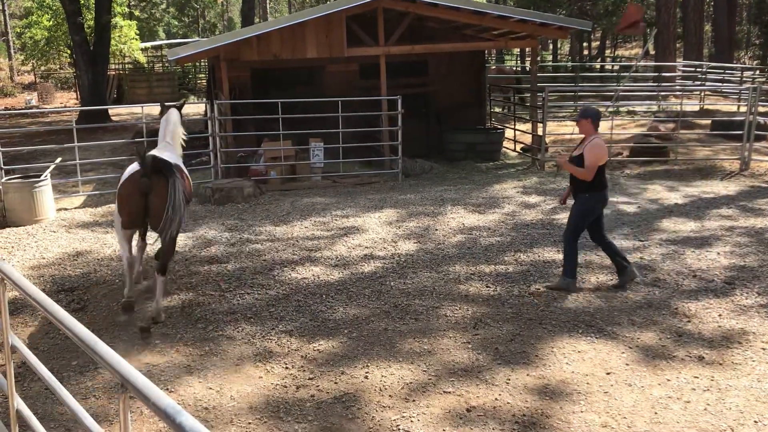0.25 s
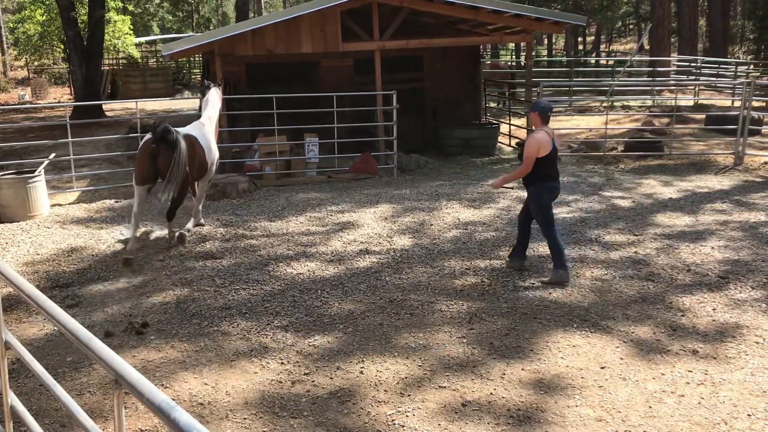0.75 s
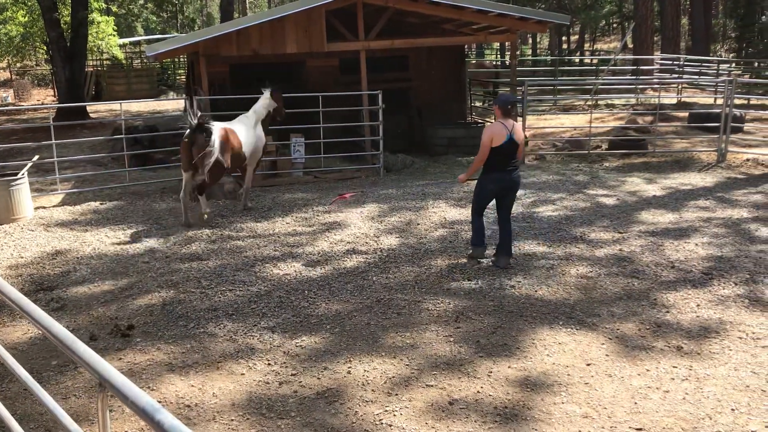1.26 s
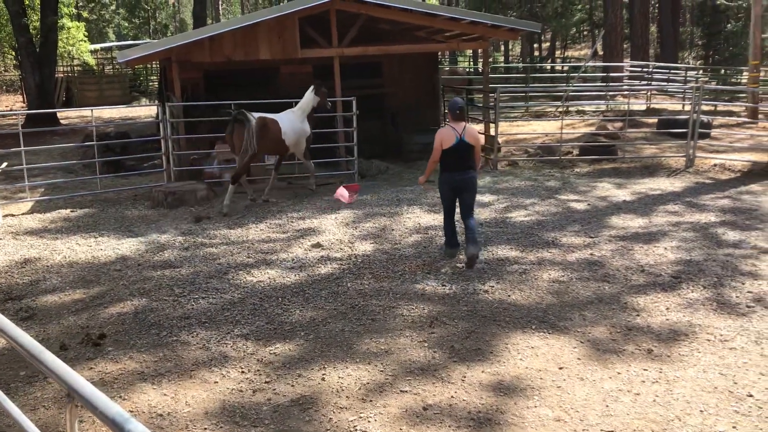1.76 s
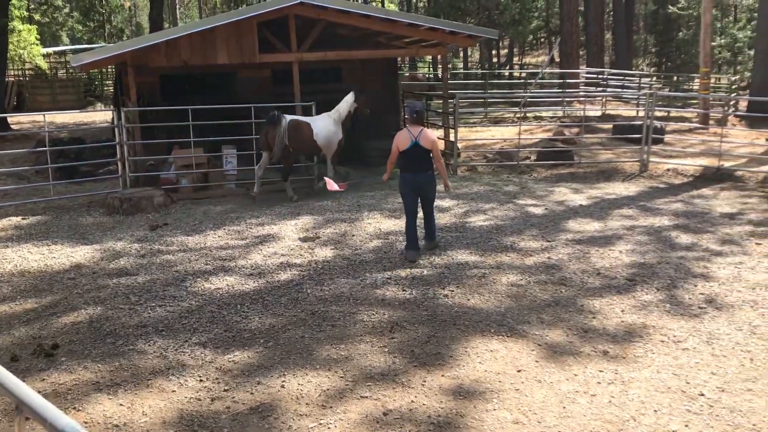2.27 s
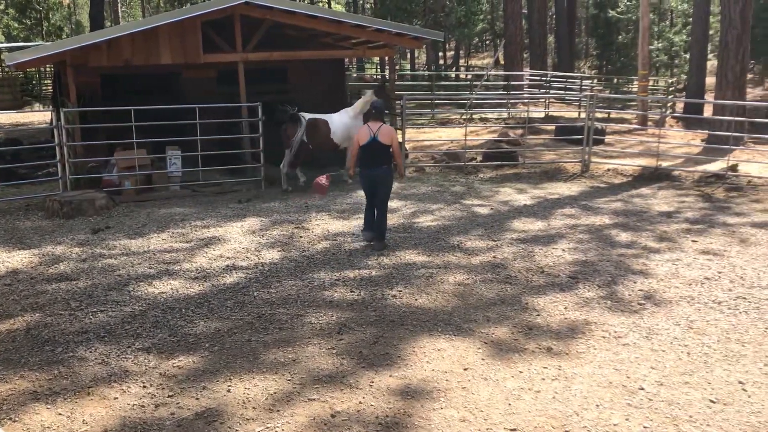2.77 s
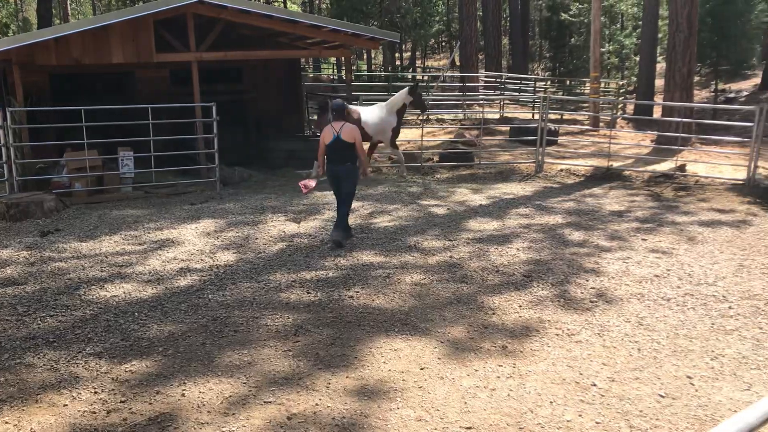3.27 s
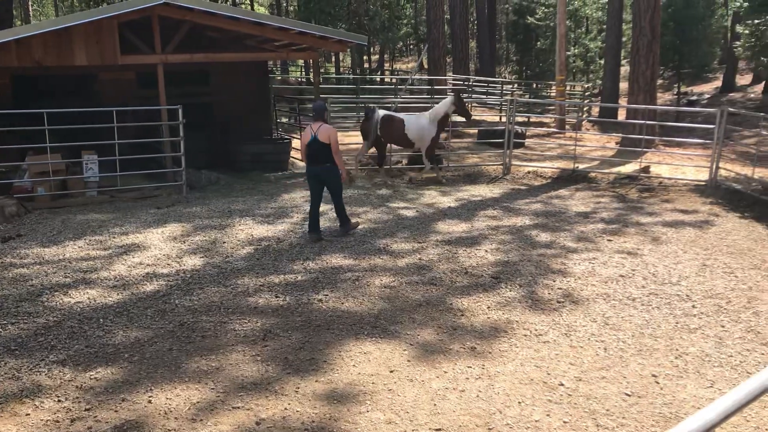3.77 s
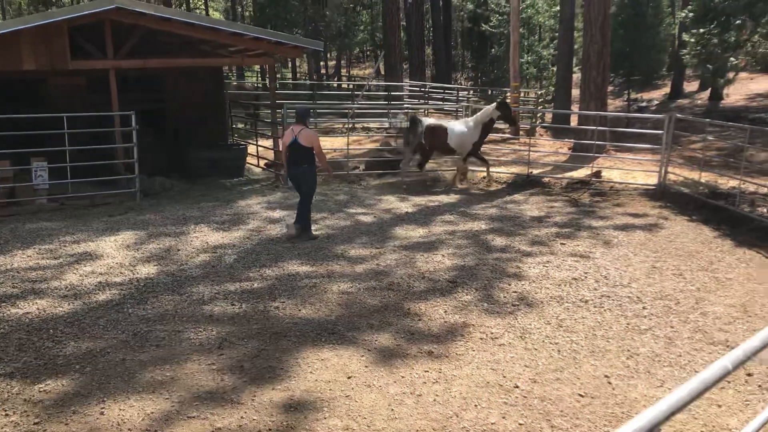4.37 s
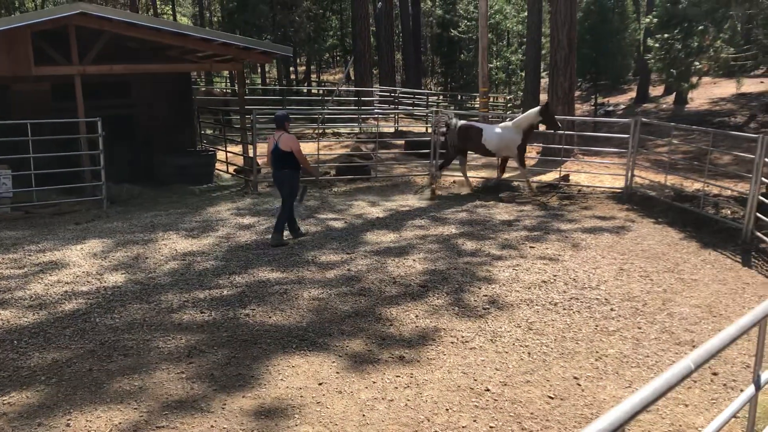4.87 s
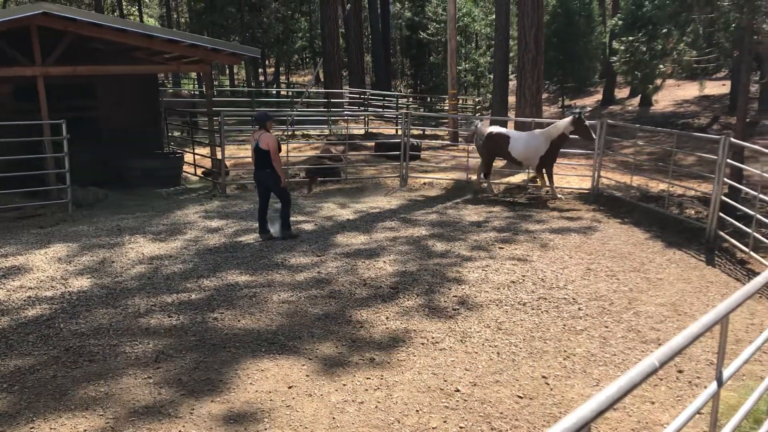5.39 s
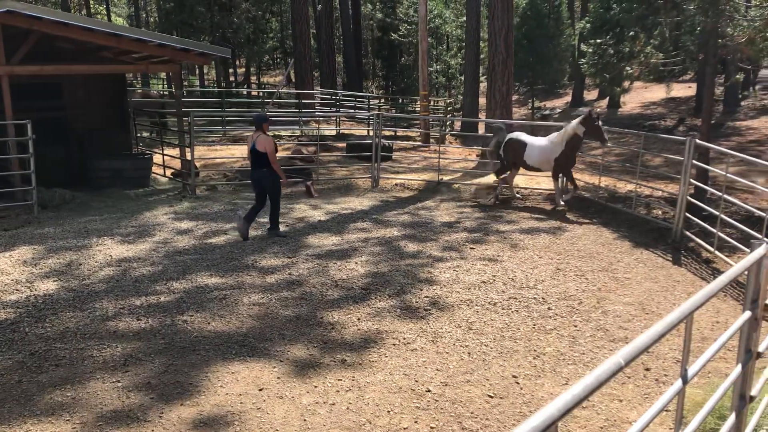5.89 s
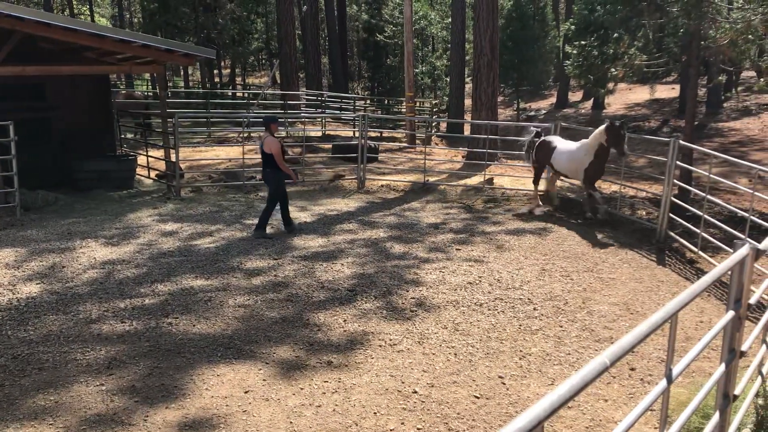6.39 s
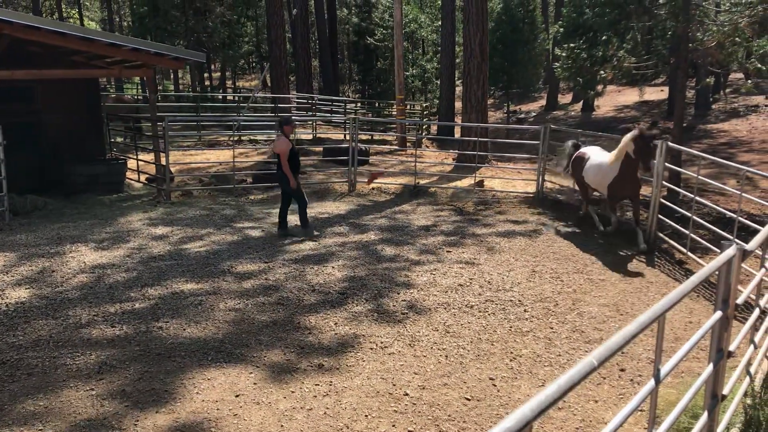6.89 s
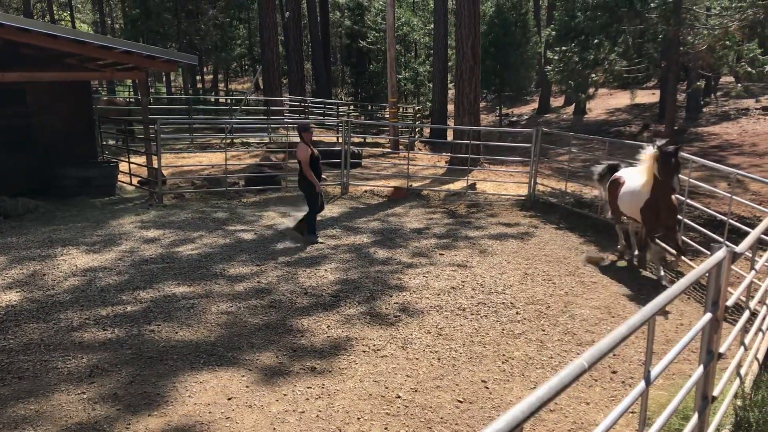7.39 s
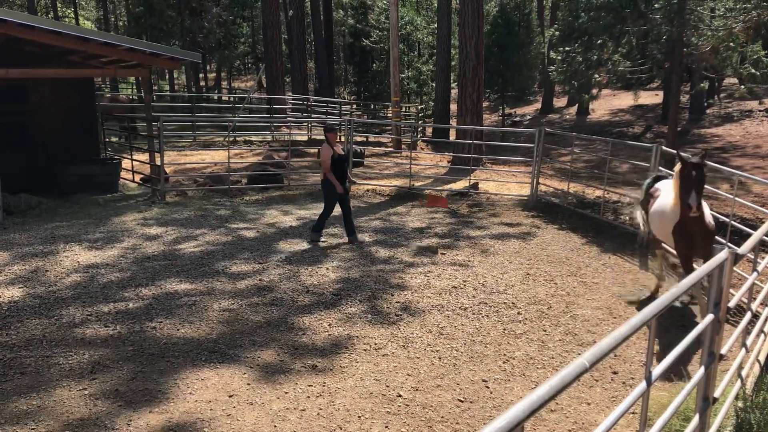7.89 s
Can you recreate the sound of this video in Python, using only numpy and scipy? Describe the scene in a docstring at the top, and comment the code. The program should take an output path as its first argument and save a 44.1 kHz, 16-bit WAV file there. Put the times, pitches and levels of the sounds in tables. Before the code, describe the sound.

Quick, uneven crunches and low thuds of a trotting horse begin near the microphone at the edge of a gravel pen. They recede, carry on softly at the far side, then approach again. Sharp stone clicks, trickling grit, a handler's steps and the odd snap of a stiff flag run through them. The surrounding trees add a slight echo and a faint, steady hush.

```python
"""A gravel pen among trees: a horse trots away from the listener and back.
Each hoof thuds on the packed ground and ploughs the gravel, and a handler's boots crunch along.
Stones clack and trickle, fine grit ticks, and a stiff flag on a stick snaps. With distance the thuds
smear and the gravel dulls. The trees scatter the sound back, and the forest hushes behind."""
import sys
import numpy as np
from scipy import signal
from scipy.fft import rfft, irfft, next_fast_len
from scipy.io import wavfile
from scipy.ndimage import map_coordinates

SR = 44100
rng = np.random.default_rng(int(sys.argv[2]) if len(sys.argv) > 2 else 0)


def digitize_waveform(pressure):
    """Quantize a signal to 16-bit integers and store it at the path in sys.argv[1].

    Rows of a 2-D input are taken as channels; values are limited to [-1, 1].
    """
    field = np.atleast_2d(pressure).T
    bounded = np.clip(field, -1, 1)
    quanta = np.round(bounded * 32767).astype(np.int16)
    wavfile.write(sys.argv[1], SR, quanta)


N = 359018

# the bright tone colour of crunching grit: f/Hz, level/dB
GRIT_SPECTRUM = [(1500, -8.5), (3500, 0.5), (6000, -5), (10000, -3), (16000, -10)]


def hoof_thuds():
    """The ground answers a hoof with a few low cycles that sink in pitch, a dull rumble and a shake."""
    # hooves landing on packed ground: t/s, level/dB, nominal ground f/Hz
    landings = [(0.06, -35.5, 148), (0.304, -40, 187), (0.475, -46, 179), (0.826, -58, 220),
                (0.95, -45.5, 238), (1.195, -53, 225), (1.56, -45, 180), (1.943, -53, 235),
                (2.362, -49, 182), (3.455, -42, 223), (3.66, -50.5, 200), (3.83, -42, 199),
                (4.212, -50, 232), (4.353, -50.5, 192), (4.822, -49, 230), (4.979, -45.5, 191),
                (5.374, -46.5, 232), (6.204, -43.5, 182), (6.594, -50, 144), (6.96, -39.5, 216),
                (7.33, -37, 101), (7.574, -39.5, 280), (7.661, -31, 160), (7.923, -27.5, 89),
                (5.035, -48.5, 139)]
    out, t = np.zeros(N), np.arange(SR // 4) / SR
    for s, db, hz in landings:
        t60 = 0.038 + 0.0083 * horse_metres(s)  # a far thud smears longer
        envelope = amp(db - 60 * t / t60) * (1 - np.exp(-t / 0.0035))
        phase = 2 * np.pi * hz * (0.797 * t + 0.00798 * (1 - np.exp(-t / 0.017)))
        rumble = 0.52 * noise_band(len(t), 1.54 * hz, width_hz=2.56 * hz)
        shake = 0.22 * noise_band(len(t), hz=77, width_hz=90) * amp(30 * t / t60)  # lasts twice as long
        add(out, s, envelope * (np.sin(phase) + rumble + shake))
    return out


def gravel_scuffs():
    """The crunch swells as a foot slides in and dies as the gravel settles; the soil beneath grumbles."""
    # hooves and boots ploughing gravel: t/s, level/dB, stone f/Hz, grit share/dB, t60/s
    scuffs = [(0.052, -21.5, 1070, -9, 0.11), (0.1, -25, 1370, -7.5, 0.21), (0.174, -32.5, 1100, -8, 0.15),
              (0.453, -32, 1120, 2, .21), (0.539, -42, 2180, -24, 0.17), (0.754, -35, 960, -7, .19),
              (0.819, -23.5, 1800, -0.5, .17), (1.108, -36, 1650, -2, 0.08), (1.175, -29, 1720, -2, .27),
              (1.275, -30, 1000, -12, 0.095), (1.455, -37.5, 1097, -1.5, 0.23),
              (1.55, -28, 2260, -1, 0.094), (1.934, -30, 1300, -9.5, .15), (2.286, -31, 1140, -5, 0.2),
              (2.504, -35.5, 1670, -24, 0.085), (2.582, -39, 706, -4.5, 0.073),
              (2.682, -35.5, 1460, -4.5, 0.083), (3.046, -38.5, 990, -7.5, .11),
              (3.118, -42.5, 970, -4, 0.27), (3.198, -33.5, 750, -8, 0.072), (3.309, -42.5, 886, -22, 0.12),
              (3.456, -39, 940, 0, 0.079), (3.492, -30, 2780, -7.5, 0.17), (3.654, -39, 2630, 3.5, 0.085),
              (3.692, -39, 2350, -2, .12), (3.805, -34, 2310, -8, 0.19), (3.861, -32.5, 2250, 0.5, .14),
              (3.968, -38.5, 977, -11, 0.15), (4.19, -35, 3530, -16, 0.26), (4.202, -39, 910, 1, 0.16),
              (4.357, -39.5, 730, 1.5, 0.15), (4.556, -35.5, 1420, -2.5, 0.13), (4.659, -37, 3200, 4, 0.12),
              (4.729, -37, 3400, 1.5, 0.13), (4.817, -39.5, 2530, 1, 0.062), (4.98, -46, 890, 3, .1),
              (5.04, -39.5, 1350, -1, 0.063), (5.349, -38, 930, -7, .135), (5.398, -37, 2290, -1, 0.18),
              (5.583, -50.5, 3520, 10.5, 0.081), (5.766, -41.5, 2700, -3.5, .12),
              (6.092, -46, 900, 0, 0.11), (6.293, -36.5, 2440, 1, 0.08), (6.422, -39, 875, 3.5, 0.079),
              (6.587, -37, 710, -8.5, 0.081), (6.943, -37.5, 980, -2, 0.19), (7.013, -32.5, 950, -7, 0.064),
              (7.04, -38, 2800, -22, 0.13), (7.189, -39.5, 2850, -6, 0.11), (7.319, -35.5, 870, -5, .09),
              (7.423, -37, 2660, -9, 0.059), (7.576, -30.5, 890, -14, 0.048),
              (7.655, -37, 920, -4.5, 0.073), (7.957, -26.5, 1050, -18, 0.14), (7.989, -40, 980, -7, 0.21)]
    out, t = np.zeros(N), np.arange(SR // 4) / SR
    for s, db, hz, grit_db, t60 in scuffs:
        slide_s = 0.16 * t60
        swell = np.clip(t / slide_s, 0, 1) ** 0.34
        settle = amp(-60 * (np.maximum(t - slide_s, 0) / t60) ** 1.157)  # holds, then drops away
        stones = pebbles(len(t), per_second=1800, hz=hz, cycles=0.43, spread_db=10, octaves=1.68)
        snaps = pebbles(len(t), per_second=160, hz=6400, cycles=0.52, spread_db=24, octaves=3.1)
        grit = sand(len(t), per_second=1500, smooth=0.99) + amp(-2) * snaps
        soil = amp(-10) * noise_band(len(t), hz=210, width_hz=410)
        add(out, s, amp(db - 15.5) * swell * settle * (stones + soil + amp(grit_db) * grit))
    return out


def clacks():
    """Stones knock or the flag snaps: a blow rings briefly at one pitch and cracks in the treble."""
    # single stone knocks and flag snaps: t/s, peak level/dB, f/Hz, treble share/dB
    knocks = [(0.023, -14.5, 2070, 6), (0.0283, -15, 2240, -11), (0.053, -24.5, 1430, -11),
              (0.065, -25.5, 1810, -14), (0.108, -28, 1350, -4.5), (0.153, -41, 883, -5),
              (0.182, -36, 1070, -22), (0.205, -32, 900, -24), (0.253, -29.5, 1070, -30),
              (0.314, -27, 1215, -4.5), (0.439, -32, 2260, -16), (0.569, -32.5, 2320, -23),
              (0.754, -33.5, 935, -2.5), (0.803, -24, 1620, -18), (0.817, -12, 1820, 12),
              (0.91, -32.5, 1410, -19), (0.934, -31.5, 961, -25), (0.965, -35, 2090, -15),
              (1.057, -29.5, 1950, -1), (1.106, -34.5, 1670, -6), (1.16, -38, 2680, -25),
              (1.175, -24.5, 1800, 11), (1.202, -28, 1860, -1), (1.213, -22.5, 1210, 3),
              (1.275, -35, 2510, -14), (1.29, -31, 940, -30), (1.458, -35.5, 1050, -15),
              (1.4735, -28, 2500, 26), (1.497, -41, 2770, -15), (1.516, -28.5, 2710, 11),
              (1.565, -38, 2430, 4), (1.671, -30, 1590, 4), (1.703, -24.5, 806, 11),
              (1.73, -21.5, 2830, -17), (1.844, -43.5, 1400, -14), (1.945, -26.5, 1150, 3),
              (2.176, -44, 1390, -16), (2.299, -29, 1030, 10), (2.371, -32, 1480, -27),
              (2.502, -38, 1720, -25), (2.672, -35, 1470, 3), (3.212, -38, 750, -32),
              (3.455, -32.5, 920, 8), (3.49, -38, 2440, -19), (3.664, -36, 2640, 6),
              (3.693, -27.5, 2240, -1), (3.821, -30, 2510, 21), (3.861, -39, 2400, -14),
              (3.897, -38, 2370, -6), (4.042, -39, 940, -5), (4.22, -28, 890, 3.5), (4.306, -37, 2800, -20),
              (4.288, -41, 900, -3), (4.321, -39, 2490, -20), (4.356, -31, 860, 5), (4.562, -30.5, 1290, 1),
              (4.671, -23.5, 3160, 19), (4.699, -41, 2500, -10), (4.763, -34.5, 3920, -10),
              (4.817, -29, 2830, -5), (5.099, -23, 1560, 13), (5.891, -35.5, 2900, 0),
              (6.273, -28, 2600, -39), (6.295, -43, 2490, -16), (6.306, -39, 3390, -20),
              (6.435, -29, 850, 0), (6.481, -39.5, 900, -9.5), (6.679, -29, 2650, 5.5),
              (6.864, -35, 845, 4.5), (6.978, -23.5, 940, 15), (7.013, -30, 934, -29),
              (7.049, -29.5, 2500, -25), (7.093, -29, 2490, 4), (7.114, -22.5, 2490, -0.5),
              (7.132, -34, 880, -19), (7.148, -28, 2580, -19), (7.172, -20, 2490, 11),
              (7.19, -27.5, 2800, -31), (7.343, -35, 910, -28), (7.445, -27.5, 1480, 13),
              (7.583, -33.5, 1100, -26), (7.665, -35.5, 1000, -33), (7.789, -39.5, 2300, -17),
              (7.919, -22.5, 930, -29), (8.004, -34.5, 930, -22)]
    out, t = np.zeros(N), np.arange(SR // 16) / SR
    for s, db, hz, treble_db in knocks:
        force = rattle(t, t60=0.019, blow=2.96)
        ring = filtered(force, lambda f: resonance(f, hz, hz / 2.66) * resonance(f, hz, 6.3 * hz) ** 2)
        clack = unit(ring) + amp(treble_db) * gritty(force)
        add(out, s, amp(db) * clack / np.abs(clack).max())
    return out


def grit_ticks():
    """Grit too small to ring low ticks in the treble."""
    # fine grit ticking and spraying: t/s, peak level/dB
    ticks = [(0.122, -22.5), (0.174, -34), (0.2138, -26.5), (0.3935, -36), (0.4505, -17), (0.5324, -29),
             (0.561, -34), (0.7926, -41), (0.8064, -16), (1.377, -34.5), (1.873, -37.5), (1.931, -38),
             (2.1117, -35), (2.281, -37), (2.4673, -43), (3.6559, -31.5), (4.155, -42), (4.188, -37),
             (4.579, -47), (4.7177, -32), (4.81, -30), (4.9102, -40), (5.152, -36.5), (5.3055, -43),
             (5.416, -30.5), (5.4454, -34), (5.4745, -29), (5.5394, -36), (5.554, -34), (5.612, -34.5),
             (5.6257, -37), (5.889, -33.5), (5.981, -40), (6.329, -40), (6.4095, -32), (7.0414, -29.5),
             (7.1172, -19), (7.149, -20.5), (7.2976, -40), (7.318, -37), (7.3736, -39), (7.416, -37),
             (7.4363, -31), (7.6076, -41), (7.6273, -33), (7.7528, -37.5), (7.9468, -42), (7.989, -49)]
    out, t = np.zeros(N), np.arange(SR // 16) / SR
    for s, db in ticks:
        hz = 14950 - 480 * horse_metres(s)  # far ticks lose their top
        force = rattle(t, t60=0.017, blow=4.45)
        tick = filtered(force, lambda f: resonance(f, hz, 1.23 * hz) ** 2)
        add(out, s, amp(db) * tick / np.abs(tick).max())
    return out


def gravel_trickle():
    """Small stones keep rolling and ticking, in uneven flurries."""
    # loose gravel between the steps: t/s, stone level/dB, grit level/dB
    levels = [(0.0, -54, -61), (0.22, -49.5, -58), (0.59, -50.5, -62), (0.81, -64, -75),
              (0.95, -50.5, -49.5), (1.2, -70, -61), (1.68, -55, -59), (2.02, -69.5, -68.5),
              (2.51, -61, -66.5), (3.0, -65.5, -71), (4.28, -67, -63), (6.01, -64.5, -69.5),
              (6.9, -64.5, -74), (7.12, -61.5, -67.5), (7.66, -64, -72), (8.14, -62, -64)]
    s, stones_db, grit_db = np.transpose(levels)
    t = np.arange(N) / SR
    stone_flurry, grit_flurry = amp(2.2 * wobble(30)), amp(2.2 * wobble(40))
    stones = pebbles(N, per_second=2300, hz=1096, cycles=0.97, spread_db=11, octaves=3.15)
    grains = sand(N, per_second=300, smooth=2.1)
    snaps = pebbles(N, per_second=70, hz=7100, cycles=0.94, spread_db=4, octaves=2.1)
    rolling = amp(np.interp(t, s, stones_db)) * unit(stone_flurry * stones)
    ticking = amp(np.interp(t, s, grit_db)) * unit(grit_flurry * (grains + 0.8 * snaps))
    return rolling + ticking


def pebbles(size, per_second, hz, cycles, spread_db, octaves):
    """Many small stones, each ringing briefly at its own pitch around hz; rms 1."""
    when, pitch, strength, side = rng.random((4, int(size * per_second / SR)))
    own_hz = np.clip(hz * 2 ** (octaves * (pitch - 0.5)), 300, 15000)[:, None]
    t = np.arange(200) / SR
    turns = t * own_hz
    attack = 1 - np.exp(-2 * turns)  # rounded stones meet softly
    decay = np.exp(-turns / cycles) * np.cos(np.pi / 2 * t / t[-1])
    kick = np.sign(side - 0.5) * amp(spread_db * strength ** 2)
    rings = kick[:, None] * np.sqrt(own_hz) * np.sin(2 * np.pi * turns) * attack * decay
    at = (when * size).astype(int)[:, None] + np.arange(len(t))
    return unit(np.bincount(at.ravel(), rings.ravel(), size)[:size])


def sand(size, per_second, smooth):
    """Sand grain contacts of unequal size over a share of smooth noise; rms 1."""
    touches = rng.random(size) < per_second / SR
    strength, wash = rng.standard_normal((2, size))
    hits = touches * strength * np.sqrt(np.abs(strength))
    return gritty(unit(hits) + smooth * wash)


def gritty(force):
    """Gives a force the bright colour of grit; rms 1."""
    return unit(filtered(force, lambda f: amp(along(GRIT_SPECTRUM, f))))


def rattle(t, t60, blow):
    """The force of a fast-dying rattle that opens with one sharper blow."""
    decay = amp(-60 * t / t60) * (0.85 + 0.17 * np.exp(-t / 0.0017))
    force = (1 - np.exp(-t / 0.00053)) * decay * rng.standard_normal(len(t))
    force[12] += blow
    return force


def hiss_puff():
    """One puff of thin, high hiss near the end starts at once and fades."""
    start_s, db, t60, low_hz, high_hz = 8.008, -56, 0.4, 7400, 12500
    out, t = np.zeros(N), np.arange(SR // 5) / SR
    noise = rng.standard_normal(len(t))
    hiss = unit(filtered(noise, lambda f: 1 / (1 + (low_hz / (f + 1)) ** 20 + (f / high_hz) ** 10)))
    add(out, start_s, amp(db - 60 * t / t60) * (1 - np.exp(-t / 0.003)) * hiss)
    return out


def tree_scatter(x):
    """Trunks, rails and a shed scatter the sound back; the treble dies first."""
    # decay of the scattered sound: f/Hz, t60/s
    decay_times = [(200, 0.58), (2000, 0.51), (12000, 0.025)]
    hz, t, spectra = signal.stft(rng.standard_normal(SR // 2), SR, nperseg=256)
    decay = amp(-60 * t / along(decay_times, hz)[:, None])
    tail = signal.istft(spectra * decay, SR, nperseg=256)[1]
    predelayed = np.pad(x, (300, 0))
    return signal.fftconvolve(predelayed, tail / np.linalg.norm(tail))[:N]


def air_loss(x, above_hz=10200, db_per_m=0.18):
    """The air takes the highest treble off far gravel."""
    top = filtered(x, lambda f: 1 / (1 + (above_hz / (f + 1)) ** 12))
    lost = 1 - amp(-db_per_m * horse_metres(np.arange(N) / SR))
    return x - lost * top


def forest_hush():
    """The forest lays a soft bed of noise; its low end comes in slow swells."""
    # the tone colour of the forest: f/Hz, level/dB
    spectrum = [(18, -29), (30, -18), (60, -4), (110, -6.5), (200, -4), (400, -4.5), (700, -7), (1300, -21),
                (2500, -29), (5000, -21), (8000, -32.5), (16000, -33.5)]
    hush = unit(filtered(rng.standard_normal(N), lambda f: amp(along(spectrum, f))))
    low_end = noise_band(N, hz=52.6, width_hz=40)
    return amp(-61 + wobble(3.44)) * hush + amp(-76 + 3.7 * wobble(2.1)) * low_end


def horse_metres(s):
    """How far away the horse is at s seconds."""
    # the horse's way out and back: t/s, distance/m
    path = [(0, 2), (1, 9.7), (2.5, 16), (5.5, 13.3), (6.8, 9), (8.14, 2.5)]
    return np.interp(s, *np.transpose(path))


def amp(db):
    """dB to gain."""
    return 10 ** (np.asarray(db) / 20)


def unit(x):
    """Scaled to rms 1."""
    return x / np.sqrt(np.mean(x ** 2) + 1e-20)


def along(points, hz):
    """Reads a curve of (f/Hz, value) points on a log frequency axis."""
    f, values = np.transpose(points)
    return np.interp(np.log(hz + 1), np.log(f + 1), values)


def wobble(rate):
    """A smooth random curve, rate knots a second."""
    knots = rng.standard_normal(int(N * rate / SR) + 4)
    return map_coordinates(knots, [np.arange(N) * rate / SR])


def filtered(x, response):
    """x shaped by a complex frequency response."""
    size = next_fast_len(len(x) + 2048)
    return irfft(rfft(x, size) * response(np.fft.rfftfreq(size, 1 / SR)), size)[:len(x)]


def resonance(f, hz, width_hz):
    """One causal resonance, gain 1 at its centre."""
    return 1j * f * width_hz / (hz * hz - f * f + 1j * f * width_hz)


def noise_band(size, hz, width_hz):
    """Noise passed twice through a resonance; rms 1."""
    return unit(filtered(rng.standard_normal(size), lambda f: resonance(f, hz, width_hz) ** 2))


def add(track, s, sound):
    """Mixes a sound in at s seconds."""
    part = track[round(s * SR):][:len(sound)]
    part += sound[:len(part)]


def scene():
    """The mono mix at the rail: the pen and its scatter, dulled by the air, over the forest bed."""
    pen = hoof_thuds() + gravel_scuffs() + clacks() + grit_ticks() + hiss_puff()
    foreground = air_loss(pen + amp(-17.5) * tree_scatter(pen) + gravel_trickle())
    return (foreground + forest_hush())[None]


def record(dry):
    """The microphone has shallow dips in its response and a band limit."""
    # dips in the microphone's response: f/Hz, width/Hz, depth/0-1
    dips = [(461, 210, 0.48), (4920, 970, 0.37), (10380, 620, 0.56)]
    top_hz = 16000

    def response(f):
        notches = [1 - depth * resonance(f, hz, width_hz) for hz, width_hz, depth in dips]
        return np.prod(notches, axis=0) * (f < top_hz)
    return filtered(dry[0], response)[None]


dry = scene()
out = record(dry)
digitize_waveform(out)
```